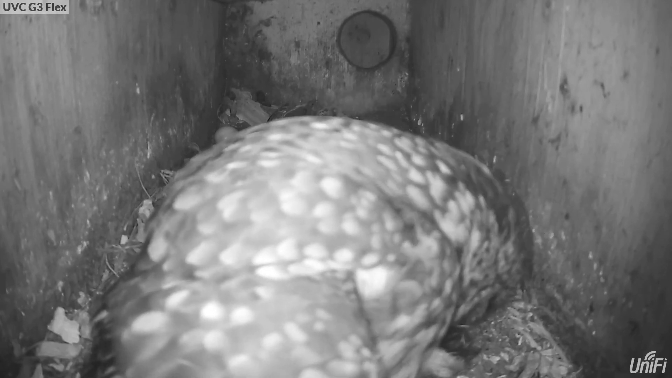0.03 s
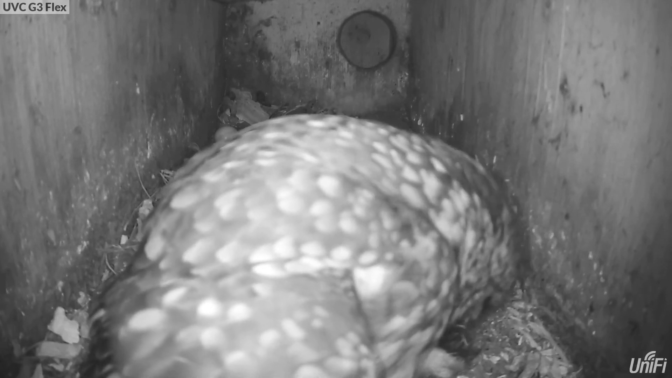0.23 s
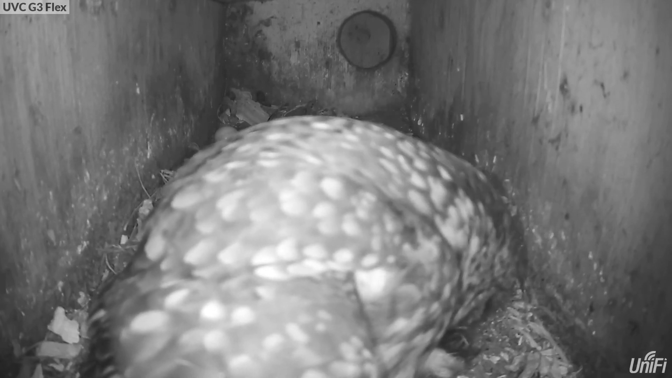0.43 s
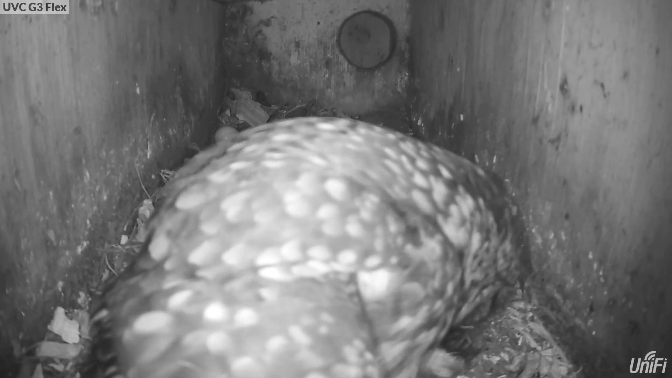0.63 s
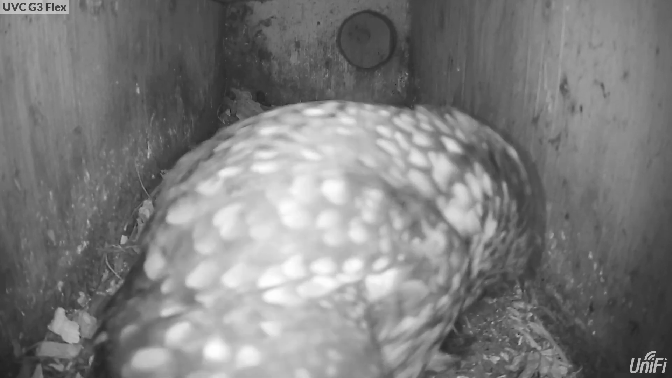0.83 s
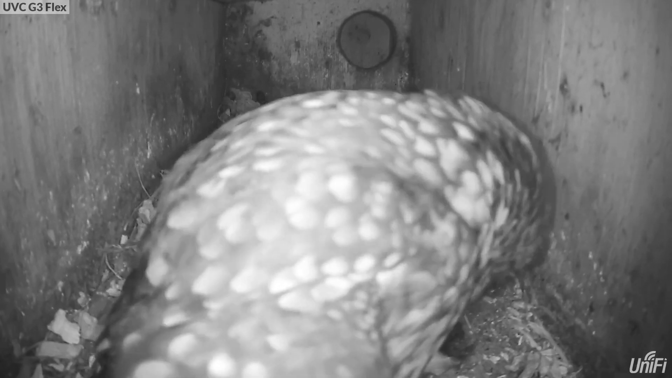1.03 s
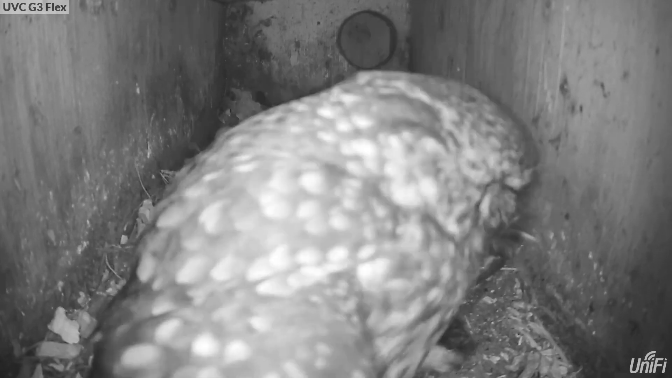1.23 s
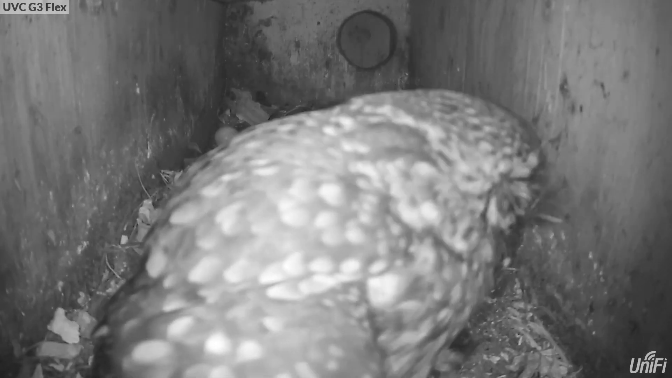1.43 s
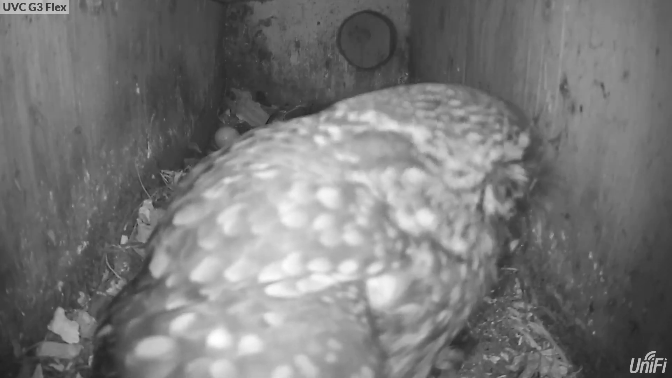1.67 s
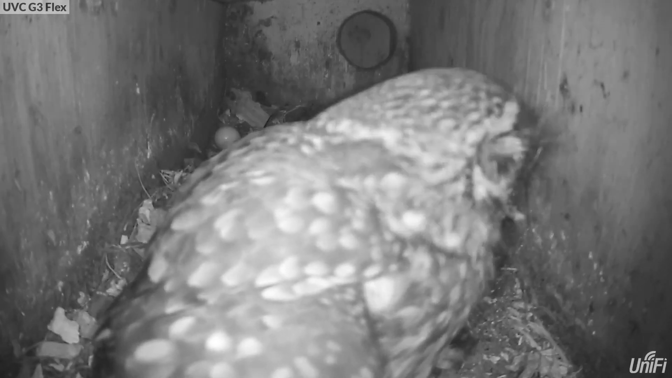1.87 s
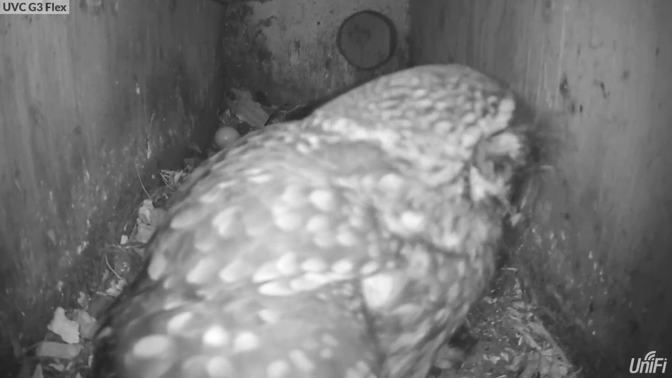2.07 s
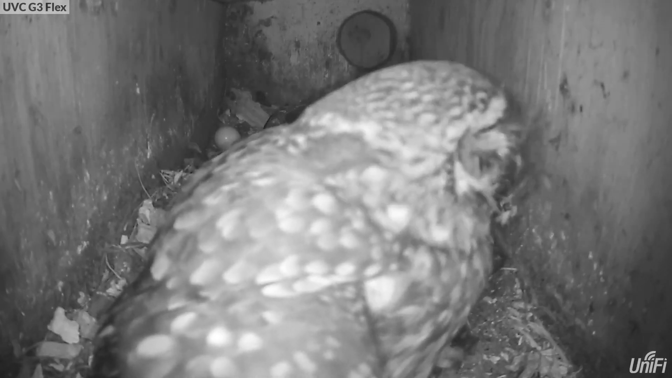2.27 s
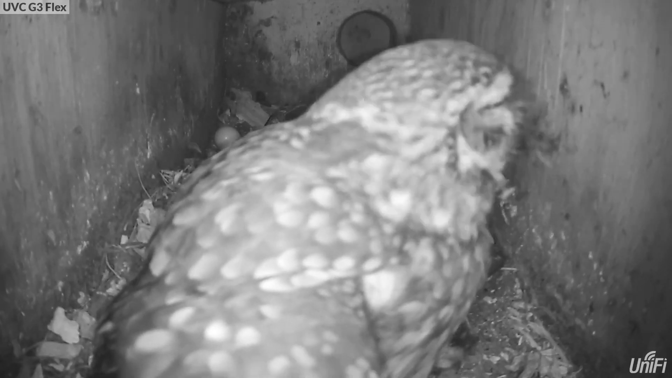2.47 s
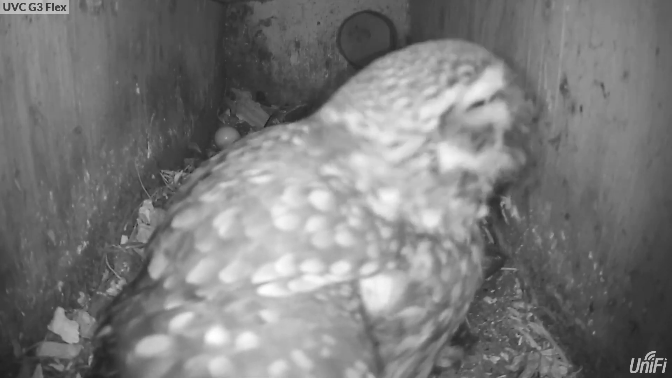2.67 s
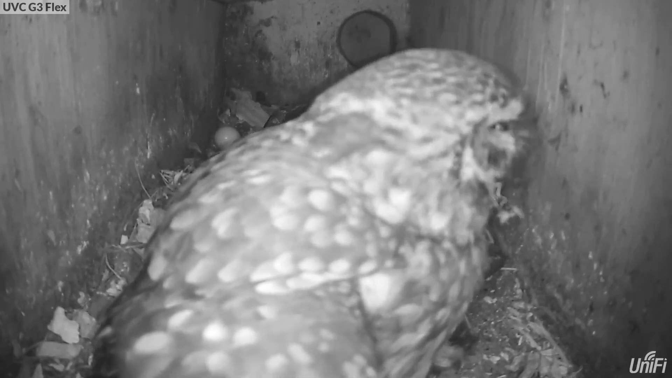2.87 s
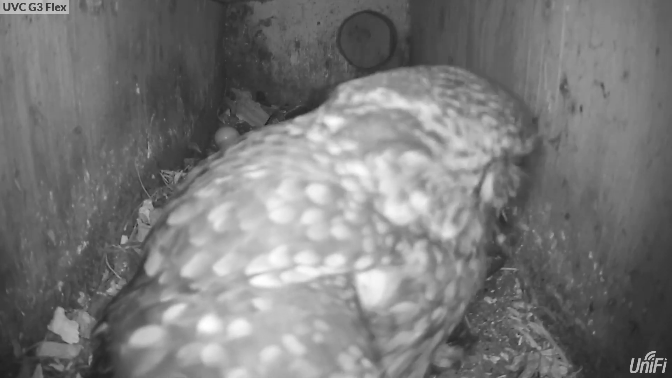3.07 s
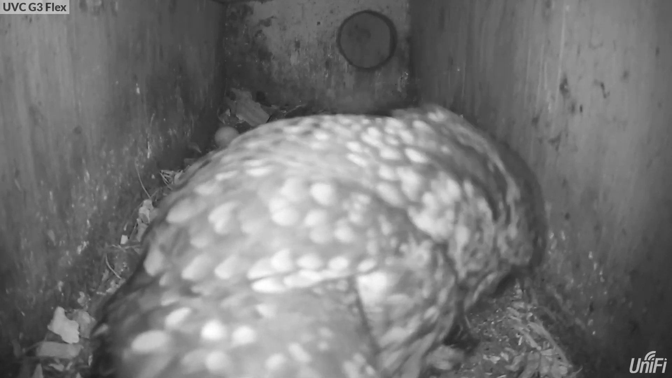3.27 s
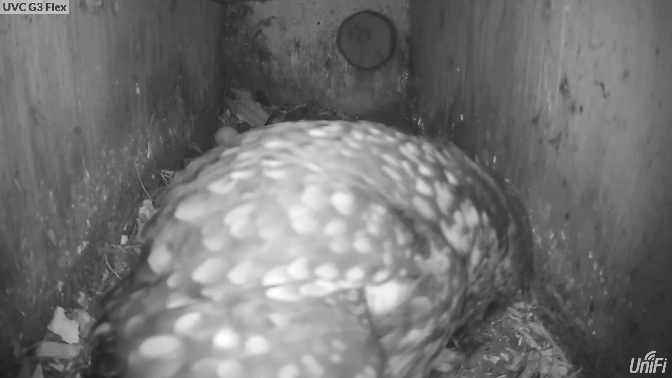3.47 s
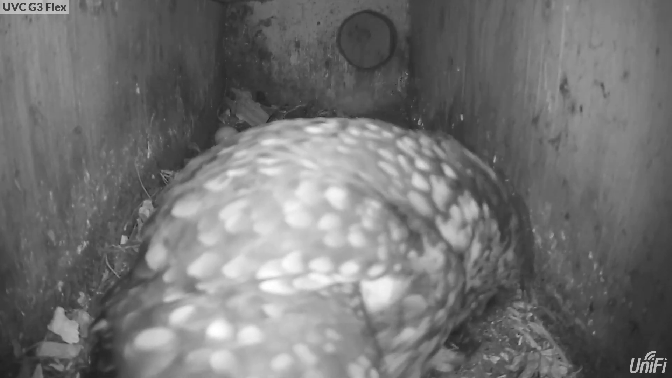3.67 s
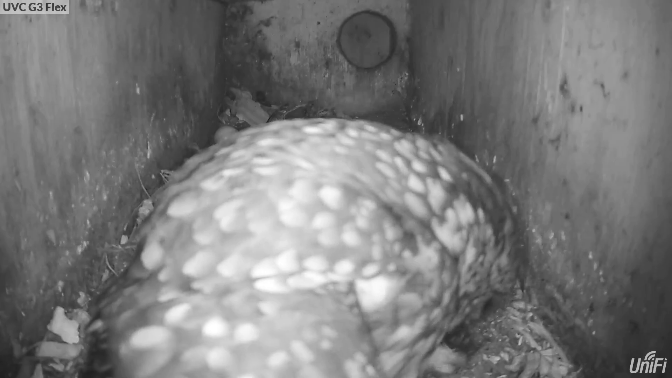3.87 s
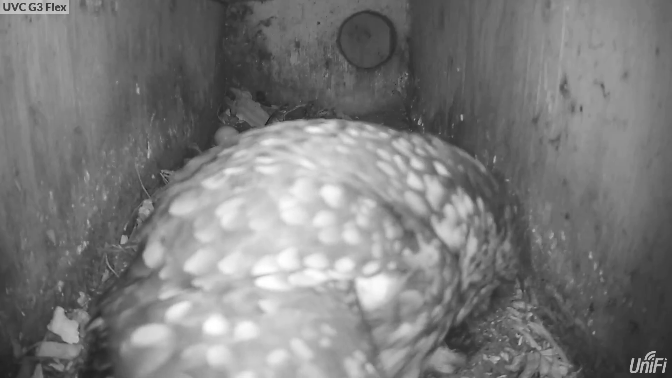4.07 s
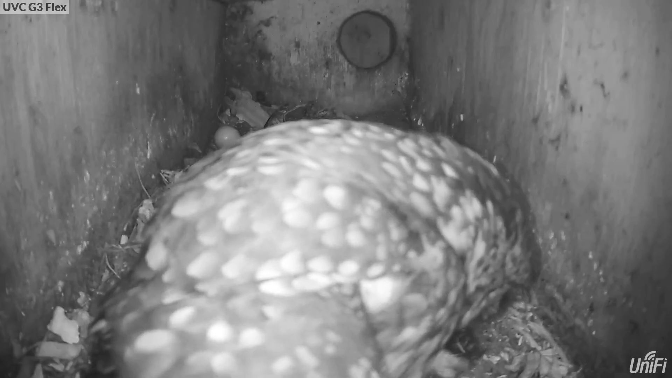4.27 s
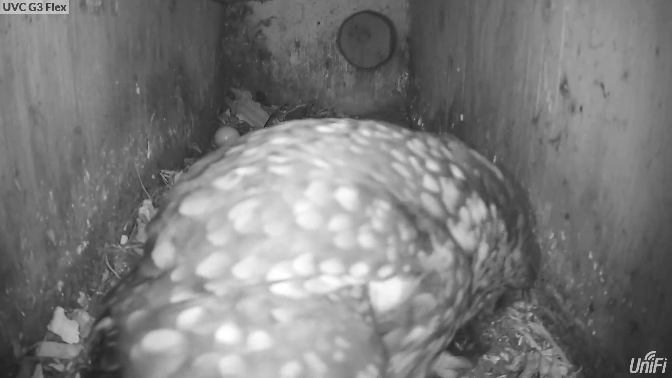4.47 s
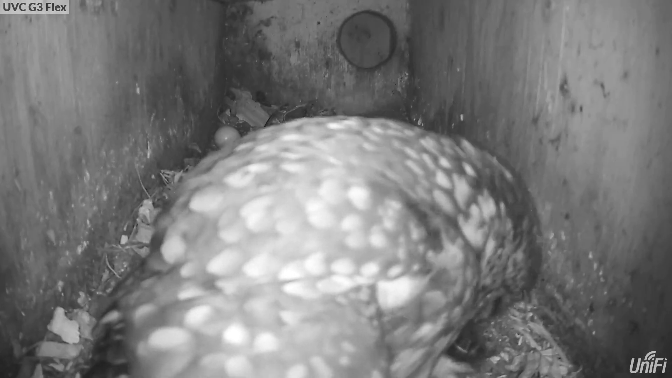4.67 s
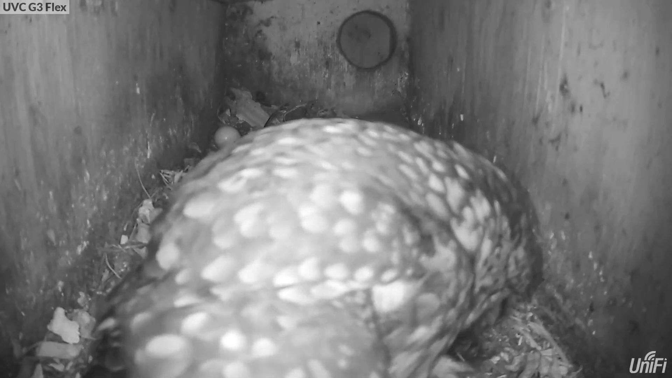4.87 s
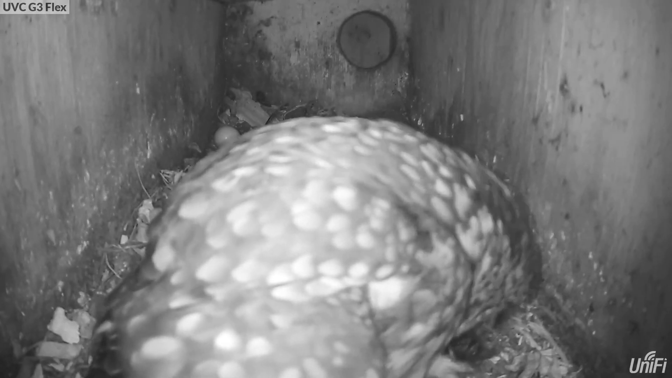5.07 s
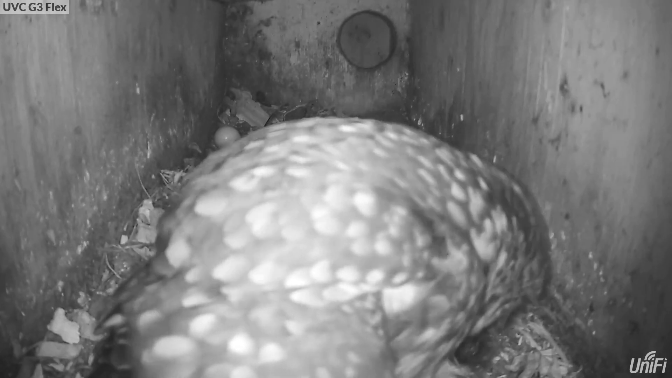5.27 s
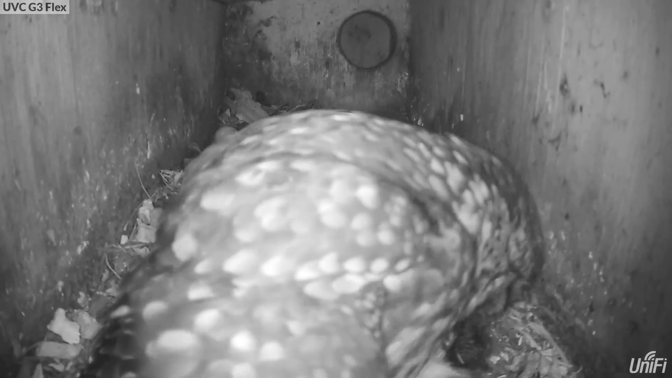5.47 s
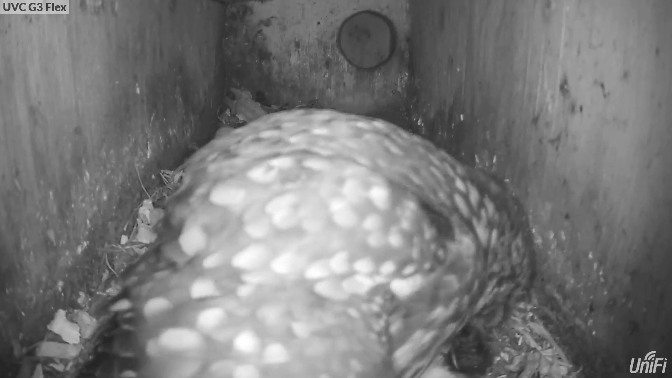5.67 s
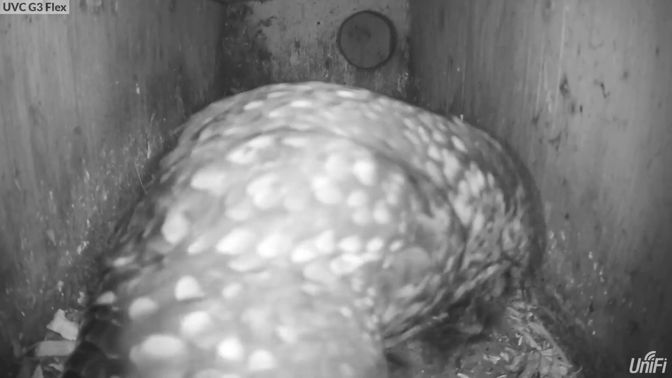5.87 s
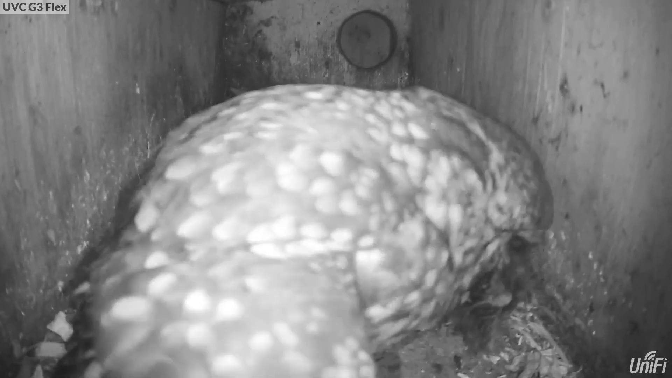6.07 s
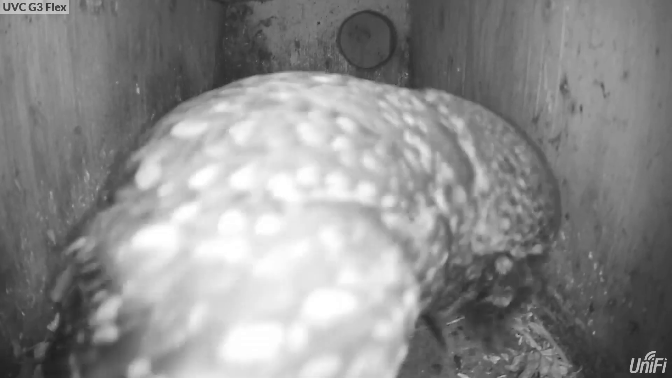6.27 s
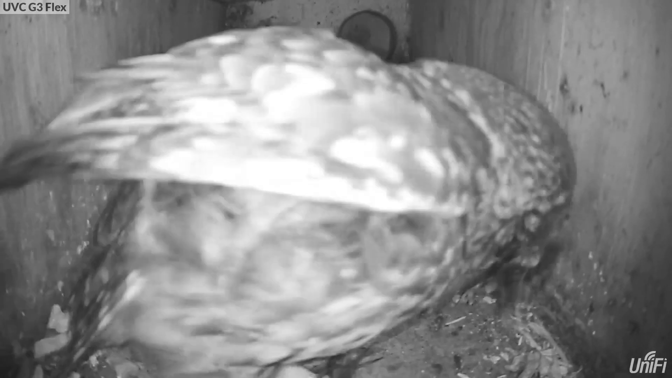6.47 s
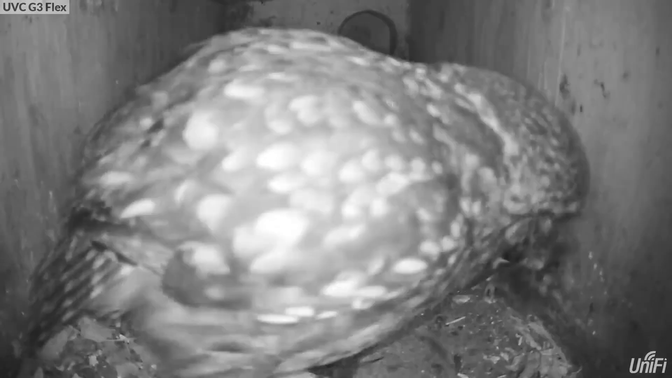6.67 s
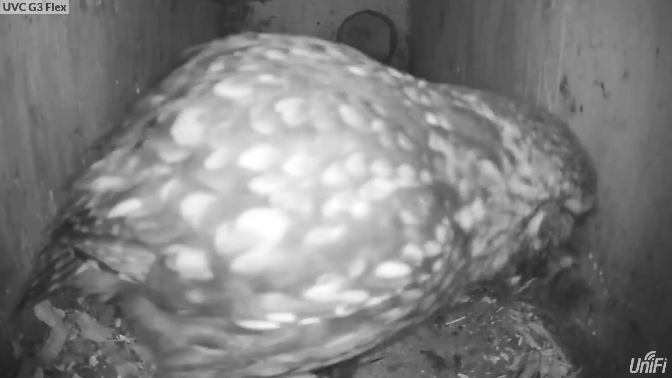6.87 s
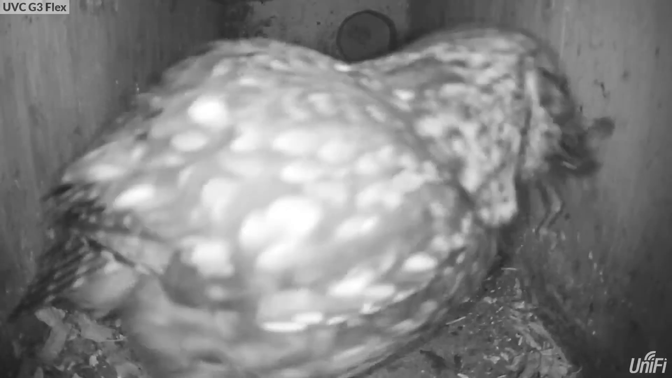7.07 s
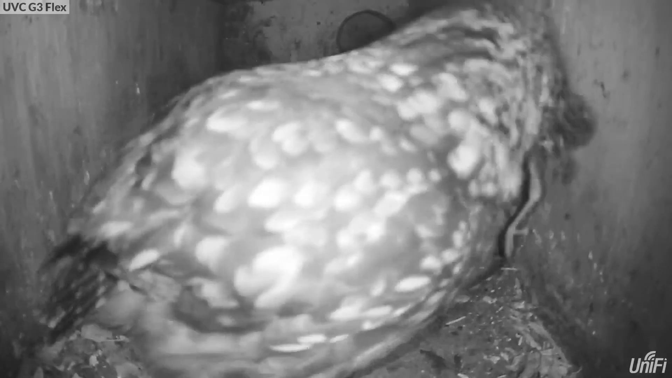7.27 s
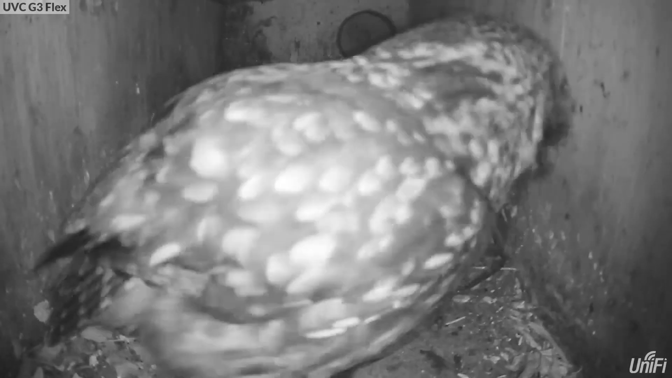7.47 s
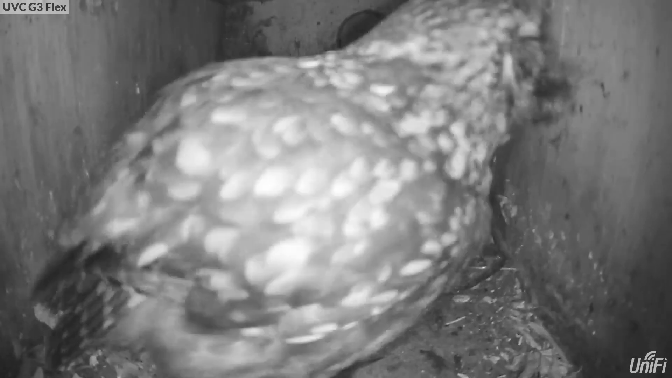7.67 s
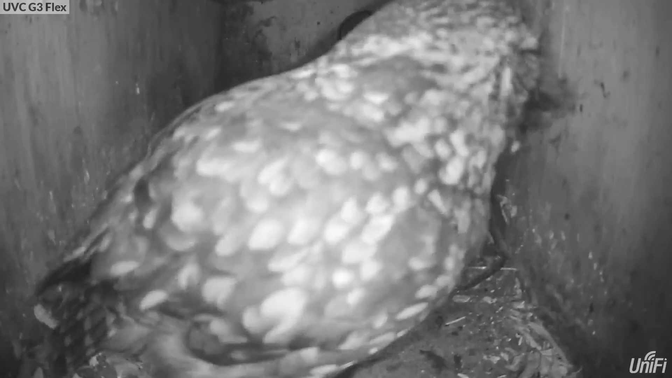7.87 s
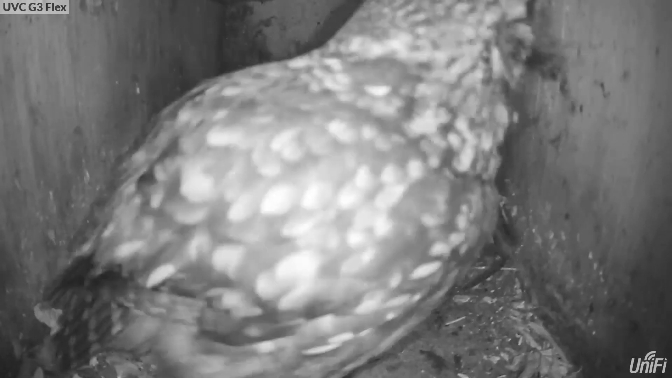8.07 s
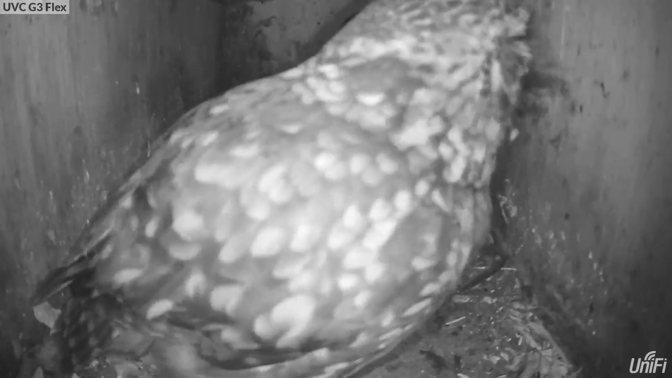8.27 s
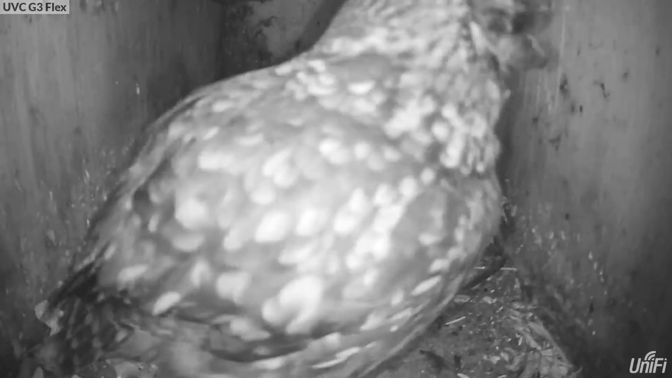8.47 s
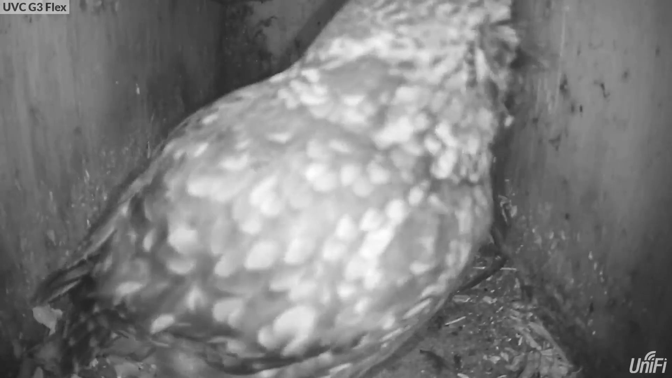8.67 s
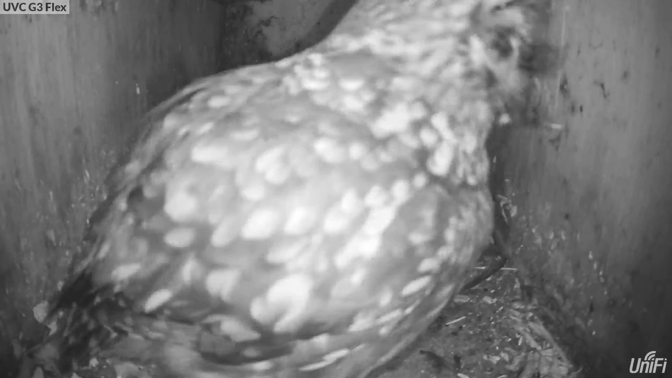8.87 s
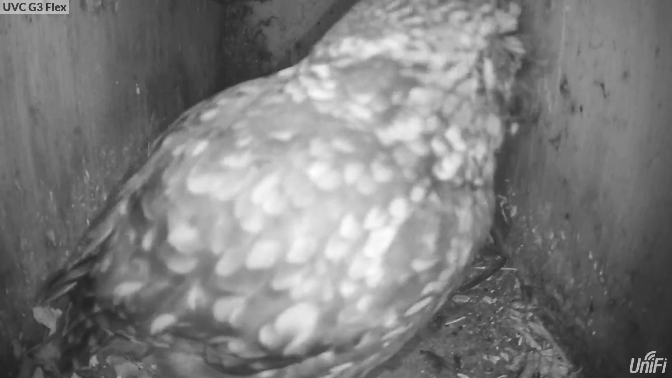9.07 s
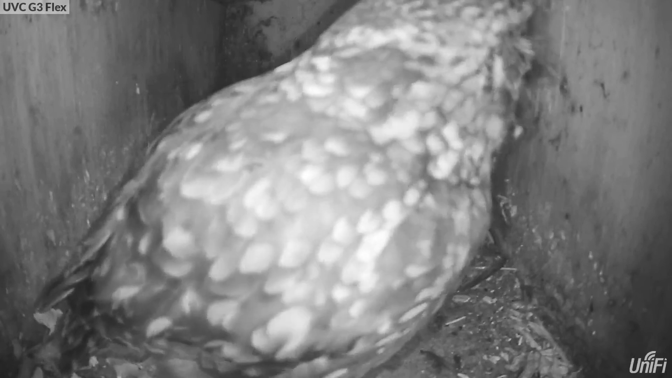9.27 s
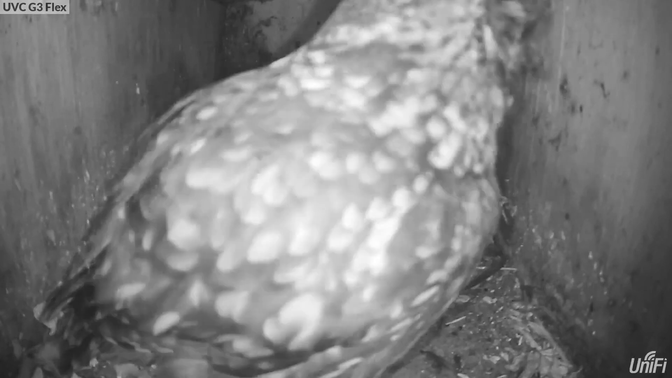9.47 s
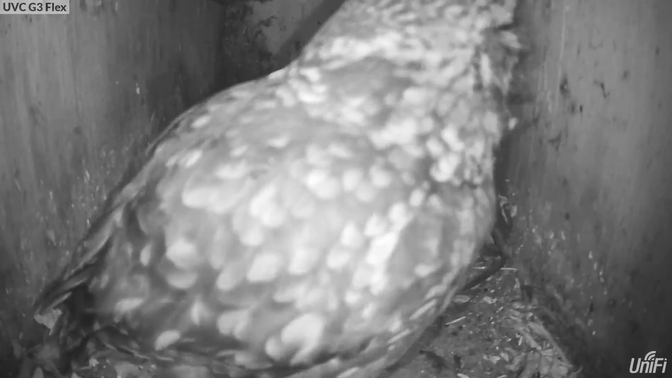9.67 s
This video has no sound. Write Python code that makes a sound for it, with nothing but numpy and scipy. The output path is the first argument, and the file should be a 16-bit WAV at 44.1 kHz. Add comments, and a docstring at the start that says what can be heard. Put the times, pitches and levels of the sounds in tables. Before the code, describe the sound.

A small owl shifts inside a wooden nest box, very close to the microphone. One loud foot thump with a snap of dry litter comes early, followed by light stirring. Past the middle, claws scrape, feet shuffle, wing feathers swish and its body knocks the wall several times before it settles. Faint songbirds tick and whistle outside over a hollow hush and low drone.

```python
"""A small owl shifts about in a wooden nest box, heard from very close.
Its feet thump the floor and its body knocks a wall, ringing the boards. Claws scrape and feathers
rustle in streams of tiny slips, and dry litter snaps underfoot. Outside, songbirds tick, whistle
and sing in gliding tones, over the hollow hush of the box and a low, far drone."""
import sys
import numpy as np
from scipy import signal
from scipy.fft import rfft, irfft
from scipy.io import wavfile

SR = 44100
rng = np.random.default_rng(int(sys.argv[2]) if len(sys.argv) > 2 else 0)


def wrap_up_sound(samples):
    """Save the sound to the file named by the first command line argument, as 16-bit audio."""
    columns = np.atleast_2d(samples).T
    # keep every value between -1 and 1, then stretch to whole-number steps
    tamed = np.clip(columns, -1, 1)
    steps = np.round(tamed * 32767).astype(np.int16)
    wavfile.write(sys.argv[1], SR, steps)


N = 428652
TIME = np.arange(N) / SR

# Resonances of the floor. Each row: pitch in Hz, relative level in dB, t60 in seconds.
FLOOR_MODES = [(207, -21, 0.13), (294.8, -5.5, 0.14), (340, -6, 0.06), (352.5, -3, 0.077),
               (446.6, 2, 0.048), (767, -5, 0.043), (827, -15.5, 0.06), (936, -7, .041), (1117, -5, 0.029),
               (1407, -10, 0.02), (1576, 2, 0.02), (1747, 0, 0.021), (1980, -13, 0.047),
               (2710, -9.5, 0.0083), (3080, -16, 0.021), (3940, -13, .026), (4160, -11.5, 0.014)]


def from_db(db):
    """Decibels to gain."""
    return 10 ** (np.asarray(db) / 20)


def rms_one(x):
    """Scale to unit rms."""
    return x / np.sqrt(np.mean(x ** 2) + 1e-20)


def add(out, start, sound):
    """Mix a short sound in at a start time in seconds."""
    at = max(round(start * SR), 0)
    out[at:at + len(sound)] += sound[:max(N - at, 0)]


def butter(x, hz, kind, order=2):
    """Causal low- or high-pass."""
    return signal.sosfilt(signal.butter(order, hz, kind, fs=SR, output="sos"), x)


def coloured(x, spectrum, size=4096):
    """Minimum-phase EQ with unit power gain: nothing sounds early."""
    hz, db = np.transpose(spectrum)
    log_hz = np.log(np.fft.rfftfreq(size, 1 / SR) + 1)
    log_gain = np.log(from_db(np.interp(log_hz, np.log(hz), db)))
    cepstrum = irfft(log_gain)[:size // 2]
    cepstrum[1:] *= 2
    response = irfft(np.exp(rfft(cepstrum, size)))
    return signal.fftconvolve(x, response / np.linalg.norm(response))[:N]


def drift(rate):
    """A random wander of rms 1 with about rate turns a second."""
    knots = rng.standard_normal(int(N / SR * rate) + 2)
    return rms_one(np.interp(TIME * rate, np.arange(len(knots)), knots))


def grains(per_s, spread_db, clump_db, clump_rate):
    """Tiny slips of uneven size, swelling in clumps; rms 1."""
    sizes = from_db(spread_db * np.minimum(rng.exponential(1, N), 4)) * rng.choice([-1, 1], N)
    slips = rng.random(N) < per_s / SR
    clumps = from_db(clump_db * np.tanh(drift(clump_rate)))
    return rms_one(sizes * slips * clumps)


def echoes(x, t60, wet_db):
    """Dense reflections that die away; the power stays about the same."""
    t = TIME[:SR // 2]
    tail = rng.standard_normal(len(t)) * from_db(-60 * t / t60) * (t > .001)
    wet = from_db(wet_db)
    return (x + wet * signal.fftconvolve(x, tail / np.linalg.norm(tail))[:N]) / np.hypot(1, wet)


def far_drone():
    """A low, distant rumble with a wavering hum in it."""
    # Its slow swell. Each row: time in seconds, relative level in dB.
    swell = [(0, -78), (2.5, -79), (4.3, -74), (6.7, -73), (8.2, -72.5), (9.72, -79.5)]
    # Its rumble. Each row: frequency in Hz, relative level in dB.
    colour = [(20, -26), (45, -10.5), (62, 2), (85, 0.5), (130, -19.5), (250, -34.5), (1000, -68)]
    hum_hz = 64.3
    hum = np.sqrt(2) * np.sin(2 * np.pi * hum_hz * TIME + 0.62 * drift(4.3))
    hum *= from_db(2.5 + 2.9 * drift(3.7))
    rumble = coloured(rng.standard_normal(N), colour, size=8192)
    return from_db(np.interp(TIME, *np.transpose(swell))) * (rumble + hum)


def box_hush():
    """Steady background noise coloured by the hollow of the box."""
    # Each row: frequency in Hz, relative level in dB.
    colour = [(20, -23), (45, -10), (64, -2.5), (85, -3.5), (145, -5), (175, -3), (208, 7.5), (245, -4.5),
              (300, 0.5), (430, -9), (505, 0), (570, -8.5), (880, -7.5), (1060, 1), (1270, -8.5),
              (1750, -5.5), (2500, -13.5), (4000, -15.5), (8000, -19), (12000, -22.5), (15500, -28.5)]
    return from_db(-58) * coloured(rng.standard_normal(N), colour, size=8192)


def note(shape, pitch=1, waver=0.0038):
    """A wavering bird tone that follows rows of seconds, frequency (times pitch, in Hz) and dB."""
    times, hz, db = np.transpose(shape)
    t = np.arange(times[0], times[-1], 1 / SR)
    wobble = np.interp(t, np.linspace(times[0], times[0] + 1, 200), rng.standard_normal(200))
    glide_hz = pitch * np.interp(t, times, hz) * (1 + waver * wobble)
    envelope = from_db(np.interp(t, times, db)) * signal.windows.tukey(len(t), .1)
    return np.sqrt(2) * envelope * np.sin(2 * np.pi * np.cumsum(glide_hz) / SR)


def calls(rows, shape, pitch_spread):
    """One call repeated, never at quite the same pitch."""
    out = np.zeros(N)
    for (start, db), sharp in zip(rows, rng.standard_normal(len(rows))):
        add(out, start, from_db(db) * note(shape, 1 + pitch_spread * sharp, waver=0.0068))
    return out


def whistles():
    """Far birds whistle straight glides, each loudest in the middle."""
    # Each row: start and length in seconds, first and last pitch in Hz, relative level in dB.
    glides = [(0, 0.049, 1750, 1770, -56), (0.133, 0.17, 1752, 1705, -52), (0.211, .22, 1878, 2020, -55.5),
              (0.545, 0.1, 2810, 2950, -59), (1.075, 0.11, 2125, 1935, -57), (1.978, 0.08, 2330, 2600, -62),
              (6.491, 0.19, 1965, 2610, -63.5), (7.028, 0.077, 1890, 2030, -53),
              (7.18, .25, 2274, 2060, -61.5), (7.293, 0.082, 3990, 3800, -63),
              (7.325, 0.144, 1717, 1745, -52), (7.59, .1, 5380, 5320, -70), (7.747, 0.1, 4030, 3980, -63.5),
              (8.23, 0.1, 4050, 3830, -65)]
    out, along = np.zeros(N), np.linspace(0, 1, 20)
    swell_db = -7 * (2 * along - 1) ** 2
    for start, length, first_hz, last_hz, db in glides:
        shape = np.transpose([length * along, first_hz + (last_hz - first_hz) * along, swell_db])
        add(out, start, from_db(db - 1.5) * note(shape, waver=.012))
    return out


def scolding(sag_hz_per_s=840, fade_db_per_s2=9.5):
    """A bird scolds in runs of ticks; each run sinks in pitch and fades ever faster."""
    # Each row: opening relative level in dB, opening pitch in Hz, tick times in seconds.
    runs = [(-46, 7600, [1.175, 1.22, 1.276, 1.352, 1.4, 1.463, 1.541, 1.612, 1.686, 1.776, 1.875]),
            (-46.5, 7500, [2.943, 2.991, 3.061, 3.135, 3.201, 3.268, 3.355, 3.424, 3.498, 3.627]),
            (-47, 7480, [4.684, 4.802, 4.859, 4.924, 5.006, 5.089, 5.224]),
            (-49, 7350, [6.809, 6.87, 6.977, 7.032, 7.103, 7.206, 7.295, 7.372, 7.495]),
            (-48.5, 7480, [8.371, 8.449, 8.567, 8.635, 8.763])]
    # A tick sweeps up and settles. Each row: time in seconds, pitch multiple, relative level in dB.
    tick = [(0, .54, -19), (.002, .64, -9.5), (.004, .86, 0), (.0055, 1.05, -0.5), (.0075, 1.22, -3),
            (.010, 1.05, -10), (.015, .99, -5.5), (.022, .98, -13)]
    out = np.zeros(N)
    for db, hz, times in runs:
        for start, (sharp, loud) in zip(times, rng.standard_normal((len(times), 2))):
            age = start - times[0]
            pitch = (hz - sag_hz_per_s * age) * (1 + .015 * sharp)
            gain = from_db(db + 1.9 * loud - fade_db_per_s2 * age ** 2)
            add(out, start, gain * note(tick, pitch))
    return from_db(2) * out


def alarm_call(start=6.268, length=.407, pitch_hz=8435, level_db=-53):
    """A long, thin whistle that starts sharp, settles and slowly sags."""
    sharp_hz, settle_s, sag_hz_per_s = 670, .02, 1270
    out, t = np.zeros(N), np.linspace(0, length, 80)
    hz = pitch_hz + sharp_hz * np.exp(-t / settle_s) - sag_hz_per_s * t
    shape = np.transpose([t, hz, np.full_like(t, level_db)])
    add(out, start, note(shape, waver=0.0011))
    return out


def chirps():
    """Thin, high chirps with a quick zigzag in pitch."""
    # Each row: start in seconds, relative level in dB.
    cues = [(.958, -49.5), (4.028, -48.5), (7.718, -51), (9.105, -60.5)]
    # One chirp. Each row: time in seconds, pitch in Hz, relative level in dB.
    zigzag = [(0, 8630, -18), (.008, 7700, -3), (.016, 8600, -5.5), (.024, 8120, 2.5), (0.03, 8960, -4),
              (.042, 7470, -3.5), (.052, 7300, -5), (.064, 8260, -11), (.085, 7500, -23)]
    return from_db(-2.5) * calls(cues, zigzag, pitch_spread=0.0073)


def song():
    """A two-note song: each note dips, then leaps to a crest that hooks over."""
    # Each row: start in seconds, relative level in dB.
    couplets = [(1.855, -58), (2.295, -56.5), (2.745, -56), (3.19, -59), (3.64, -62), (4.13, -61.5)]
    low_hz, high_hz = 2857, 3470
    note_s, step_s, dip_s, rise_s = 0.074, .088, 0.0131, 0.041
    t = np.linspace(0, step_s + note_s, 120)
    age = t % step_s
    climb = (1 - np.cos(np.pi * np.minimum((age - dip_s) / rise_s, 1.25))) / 2
    swell = np.sin(np.pi * np.clip(age / note_s, .01, .99))
    # The voice is softer on the crest and thins in mid-leap.
    db = 10 * np.log10(swell) - 4.5 * climb - 7 * np.sin(np.pi * climb)
    shape = np.transpose([t, low_hz + (high_hz - low_hz) * climb, db])
    return from_db(1.5) * calls(couplets, shape, pitch_spread=0.0051)


def songbirds():
    """Birds outside: their calls scatter among the trees and again inside the box."""
    far, ticks, alarm = whistles(), scolding(), alarm_call()
    near = echoes(ticks + chirps(), t60=0.05, wet_db=4) + alarm
    far += song()
    near = echoes(near, t60=0.25, wet_db=-7)
    flicker = from_db(2 * drift(45))
    return near + echoes(far * flicker, t60=0.553, wet_db=-6)


def fidgeting():
    """Gain of the owl's slight, constant stirring."""
    # Each row: time in seconds, relative level in dB.
    stir = [(0, -71), (1.3, -67.5), (2.0, -69.5), (2.6, -66.5), (3.1, -75), (4.4, -68), (4.95, -69),
            (6.0, -61), (7.3, -69.5), (8.3, -67), (9.05, -79), (9.72, -79)]
    return from_db(np.interp(TIME, *np.transpose(stir)))


def litter(snap_t60=0.0074):
    """Dry bits break underfoot in short bursts of crackle; crumbs tick as the owl stirs."""
    # Each row: start in seconds, relative level in dB.
    snaps = [(0.7023, -38), (0.8729, -21), (1.1075, -35), (1.214, -39.5), (2.379, -43), (2.4244, -48),
             (2.5159, -30), (3.345, -39.5), (4.6176, -27), (4.734, -39.5), (5.4387, -39), (5.444, -34.5),
             (5.4542, -34), (5.4918, -37.5), (5.581, -38), (5.8128, -27.5), (5.8575, -36.5), (5.916, -34),
             (5.937, -33), (6.034, -34), (6.055, -33), (6.398, -27.5), (9.271, -32), (9.296, -38)]
    # Their brittle tone. Each row: frequency in Hz, relative level in dB.
    colour = [(700, -36), (2000, 0), (4000, -0.5), (6000, 0.5), (9000, 2.5), (12000, 2), (15500, -7.5)]
    bursts, t = np.zeros(N), TIME[:SR // 30]
    for start, db in snaps:
        add(bursts, start, from_db(db - 60 * t / snap_t60) * rng.standard_normal(len(t)))
    crumbs = fidgeting() * grains(per_s=20, spread_db=3, clump_db=5, clump_rate=8)
    return coloured(from_db(-5) * bursts + from_db(-8) * crumbs, colour)


def strokes(rows, attack_s, release_t60):
    """Gain of a series of rubbing movements: each swells, holds and dies away."""
    power = np.zeros(N)
    for start, length, db in rows:
        t = np.arange(0, length + release_t60, 1 / SR)
        attack = np.minimum(t / attack_s, 1)
        release_db = -60 * np.maximum(t - length, 0) / release_t60
        add(power, start, (attack * from_db(db + release_db)) ** 2)
    return np.sqrt(power)


def wing():
    """Stiff wing feathers slide: their barbs zip past each other in a fine, very bright swish."""
    # Each row: start and length in seconds, level in dB.
    swishes = [(6.045, .075, -50.5), (6.155, 0.055, -54.5)]
    # Their sheen. Each row: frequency in Hz, relative level in dB.
    colour = [(3000, -25), (7000, -11), (10500, 3), (13500, 4), (15500, -5)]
    barbs = coloured(grains(per_s=7100, spread_db=2, clump_db=5, clump_rate=160), colour)
    return strokes(swishes, attack_s=.016, release_t60=0.085) * barbs


def skids():
    """A claw catches and slips on the grain in a short crunch."""
    # Each row: start in seconds, relative level in dB, t60 in seconds.
    catches = [(0.884, -28, 0.04), (5.269, -39.5, 0.11), (5.342, -49, .09), (5.446, -47, 0.058),
               (5.471, -43.5, .04), (5.598, -53, 0.19), (5.705, -47.5, 0.099), (5.763, -32.5, 0.02),
               (5.778, -37.5, 0.062), (5.868, -52, 0.11), (6.102, -36.5, 0.038), (6.405, -36, 0.032),
               (6.69, -55, .08), (6.941, -51, 0.14), (7.869, -45, 0.02)]
    # The crunch. Each row: frequency in Hz, relative level in dB.
    colour = [(300, -16), (620, 1), (1000, -4), (1250, -9), (1600, 2.5), (2000, -11), (2500, -6.5),
              (3100, -12.5), (3700, -6), (4200, -9.5), (4700, -18.5), (9000, -29)]
    grip, t = np.zeros(N), TIME[:SR // 6]
    for start, db, t60 in catches:
        add(grip, start, from_db(db - 60 * t / t60))
    slips = grains(per_s=1500, spread_db=3, clump_db=2, clump_rate=250)
    return from_db(1) * coloured(grip * slips, colour)


def board(modes, weight_db=0, low_below_hz=600):
    """A struck board rings: neighbouring modes swing opposite ways; weight favours the low ones."""
    t = TIME[:SR // 3]
    ring = np.zeros(len(t))
    for k, (hz, db, t60) in enumerate(modes):
        decay = from_db(db + weight_db * (hz < low_below_hz) - 60 * t / t60)
        ring += (-1) ** k * decay * np.sin(2 * np.pi * hz * t)
    return ring


def shuffling():
    """Feet drag over the floor and make it rumble, claws scrape, feathers brush the walls."""
    # Each row: start and length in seconds, then relative scrape, foot pressure and rustle in dB.
    shuffles = [(0, 0.26, -62.5, -71, -94), (0.559, 0.077, -52.5, -55, -58),
                (0.67, 0.086, -59.5, -53.5, -68), (0.775, 0.067, -57.5, -47.5, -66),
                (0.882, 0.045, -51, -60, -57.5), (0.964, 0.1, -52.5, -62, -62.5),
                (1.136, 0.043, -57.5, -65, -70), (1.265, 0.25, -64, -79, -71), (2.3, 0.086, -68, -72, -69),
                (3.815, 0.11, -65, -56.5, -84), (4.453, 0.16, -61.5, -69, -69.5),
                (4.69, 0.035, -66, -52, -75), (5.08, 0.067, -60, -55, -71), (5.147, 0.078, -57, -53, -62.5),
                (5.31, 0.075, -58, -46.5, -64.5), (5.425, 0.038, -67, -55, -61.5),
                (5.56, 0.062, -51.5, -43.5, -54), (5.625, .1, -51.5, -54, -60.5),
                (5.764, 0.033, -58, -41, -68), (5.83, 0.11, -56.5, -56, -69),
                (6.043, 0.071, -54.5, -44.5, -56), (6.138, 0.056, -55, -48.5, -59.5),
                (6.313, .07, -55.5, -59, -66), (6.504, 0.045, -62.5, -62, -73),
                (6.665, 0.034, -50.5, -60, -62), (6.838, 0.064, -61, -67, -64.5),
                (6.93, 0.034, -51, -54.5, -58), (7.153, 0.045, -61.5, -58.5, -63),
                (7.437, 0.038, -60, -56, -62), (7.799, 0.063, -59.5, -63, -67.5),
                (8.218, 0.056, -62, -70, -70), (8.627, 0.16, -64.5, -65, -70),
                (9.22, 0.12, -62, -62.5, -71)]
    # Tone of claws and of feathers. Each row: frequency in Hz, relative level in dB.
    claw_colour = [(300, -12.5), (500, 0.5), (630, -5), (760, -1), (900, -1), (1070, 1), (1280, -3.5),
                   (1600, 3.5), (1900, 1.5), (2200, -12), (3000, -12), (3700, -11.5), (5000, -24),
                   (8000, -24.5)]
    feather_colour = [(900, -15), (2000, 6.5), (3600, 4), (5000, 5), (8000, 5), (11000, 2), (15500, -10.5)]
    starts, lengths, scrape_db, pressure_db, rustle_db = np.transpose(shuffles)

    def movement(levels_db, fidget_db):
        """Gain of the shuffles, with fidgeting in between."""
        moves = strokes(zip(starts, lengths, levels_db), attack_s=0.019, release_t60=0.23)
        return np.hypot(moves, from_db(fidget_db) * fidgeting())

    slips = grains(per_s=900, spread_db=1, clump_db=1, clump_rate=150)
    drag = signal.fftconvolve(slips, board(FLOOR_MODES))[:N]
    rumble = rms_one(butter(butter(drag, 190, "low"), 147, "high", order=4))
    claws = coloured(grains(per_s=1300, spread_db=2.5, clump_db=6, clump_rate=110), claw_colour)
    feathers = coloured(grains(per_s=9000, spread_db=6, clump_db=3, clump_rate=110), feather_colour)
    return (from_db(-3.5) * movement(pressure_db, fidget_db=-6.5) * rumble
            + from_db(2) * movement(scrape_db, fidget_db=0) * claws
            + from_db(3) * movement(rustle_db, fidget_db=-4) * feathers)


def blows(rows, modes, vary_db):
    """Each blow lands on a new spot and rings its own mix of modes; a soft contact dulls the top."""
    out = np.zeros(N)
    for start, db, contact_hz, weight_db in rows:
        spot = rng.uniform(-1.65, 1, len(modes))
        mix = [(hz, level + vary_db * luck, t60) for (hz, level, t60), luck in zip(modes, spot)]
        ring = butter(board(mix, weight_db), contact_hz, "low")
        ring = butter(ring, 100, "high")
        add(out, start, from_db(db) * ring / np.abs(ring).max())
    return out


def wall_knocks():
    """The owl's body bumps a wall and sets it ringing."""
    # Each row: start in seconds, peak in dB, contact cut-off in Hz, low-mode weight in dB.
    knocks = [(6.399, -30.5, 2500, -18), (6.4045, -23, 2200, -6.5), (6.6455, -27.5, 1490, 6),
              (6.9065, -29, 1800, 6), (7.5235, -39.5, 1400, -16), (7.527, -38, 1190, 14)]
    # Resonances of the wall. Each row: pitch in Hz, relative level in dB, t60 in seconds.
    wall_modes = [(290, -37, .09), (360, -10.5, 0.11), (509, -0.5, 0.092), (670, -1, 0.051),
                  (744, -4.5, 0.067), (1070, 4, 0.03), (1180, -8, 0.085), (1484, 10, 0.029),
                  (1786, 0, 0.027), (2520, -19, .02), (2930, -5, 0.016)]
    return blows(knocks, wall_modes, vary_db=7)


def footsteps():
    """The owl's feet thump on the wooden floor."""
    # Each row: start in seconds, peak in dB, contact cut-off in Hz, low-mode weight in dB.
    steps = [(.403, -41, 140, 0), (.526, -40, 350, -5), (.8715, -21.5, 6000, -7), (.8825, -4, 2100, 2.2),
             (.909, -28, 260, 3), (.921, -30, 200, -2), (.942, -41, 5000, 1), (.9805, -33, 130, 2),
             (2.637, -40.5, 3000, -4), (3.642, -39.5, 220, -6), (3.858, -39, 335, -9.5),
             (4.616, -47, 7000, -17), (5.087, -38.5, 5000, -11), (5.269, -28.5, 3500, -6.5),
             (5.342, -35, 280, 0), (5.381, -39, 400, -6), (5.471, -36, 5000, 2), (5.711, -36.5, 6000, 17),
             (5.736, -36.5, 450, 5), (5.7625, -28.5, 5500, 2), (5.778, -34, 5000, -6), (5.785, -34, 398, 9),
             (5.889, -46, 5000, -12), (5.916, -38, 5000, 3), (6.033, -35, 6000, -17),
             (6.102, -32.5, 420, -6), (6.227, -44, 795, -2), (6.272, -38, 2000, -11), (6.62, -37, 4500, -8),
             (7.869, -38, 3000, -8.5), (7.896, -42.5, 2500, -17), (9.271, -44.5, 2500, -6)]
    return blows(steps, FLOOR_MODES, vary_db=-0.6)


def scene():
    """The owl in its box, the birds outside and the background, in mono."""
    wood = footsteps() + wall_knocks()
    friction = shuffling() + wing() + skids()
    owl = echoes(wood, t60=0.12, wet_db=-25.5)
    owl += echoes(friction, t60=0.036, wet_db=-8)
    owl += echoes(litter(), t60=0.044, wet_db=-7.5)
    return (owl + songbirds() + far_drone() + box_hush())[None]


def record(dry):
    """A steep low-pass takes off the very top."""
    cutoff_hz = 15550
    return signal.sosfilt(signal.ellip(12, .1, 80, cutoff_hz, fs=SR, output="sos"), dry)


dry = scene()
out = record(dry)
wrap_up_sound(out)
```